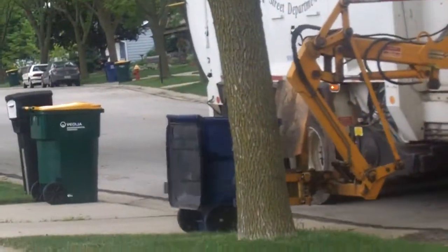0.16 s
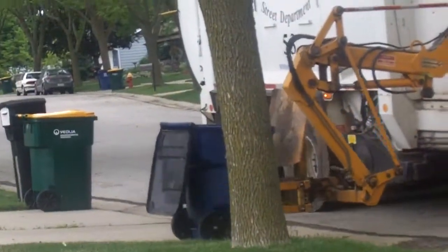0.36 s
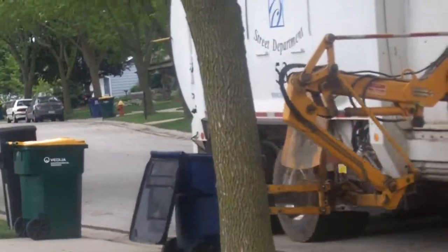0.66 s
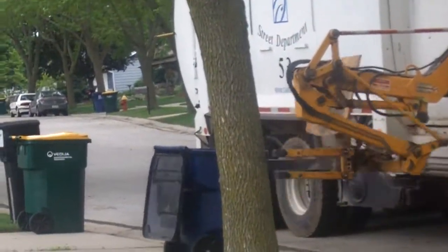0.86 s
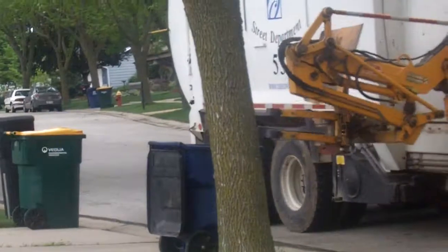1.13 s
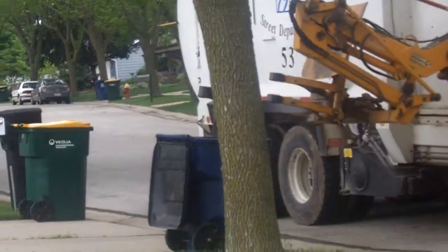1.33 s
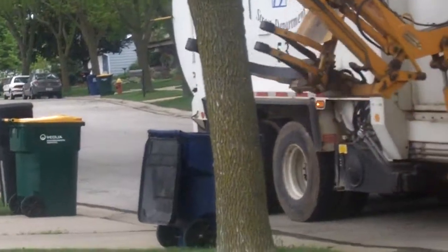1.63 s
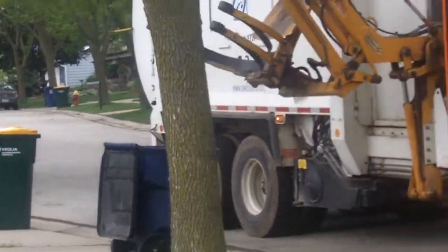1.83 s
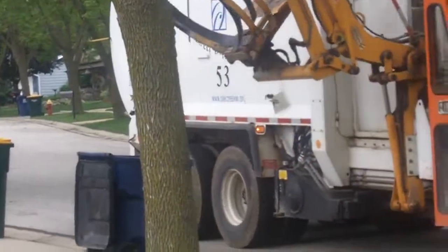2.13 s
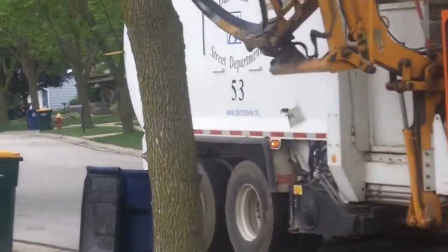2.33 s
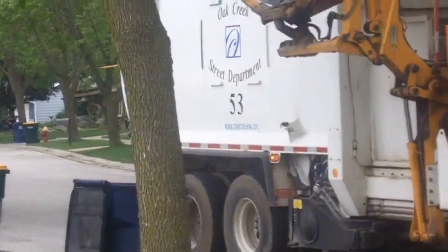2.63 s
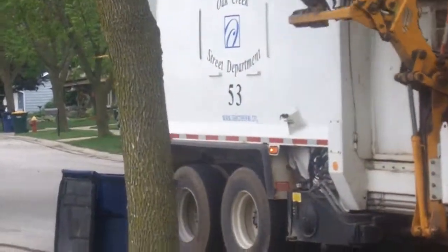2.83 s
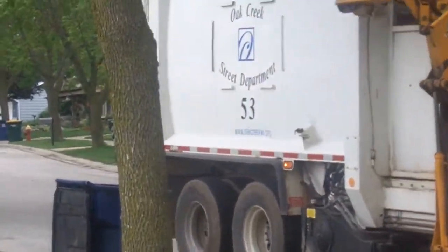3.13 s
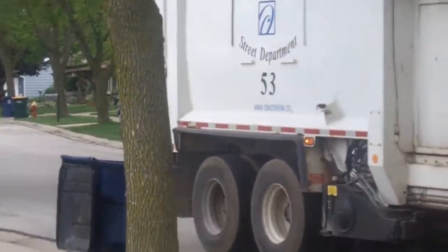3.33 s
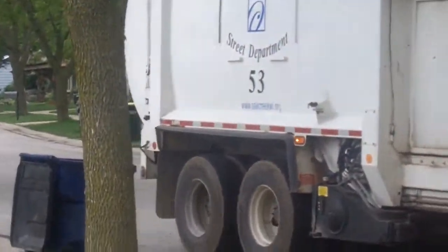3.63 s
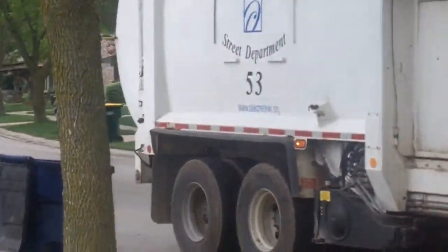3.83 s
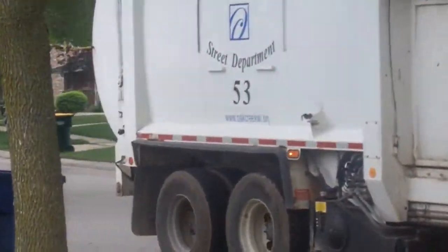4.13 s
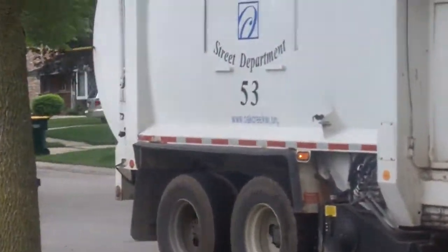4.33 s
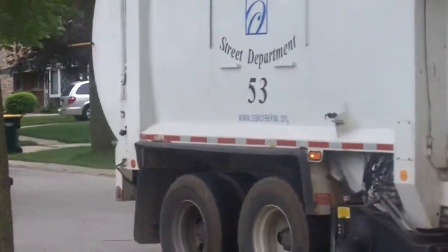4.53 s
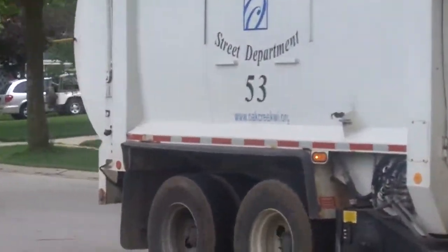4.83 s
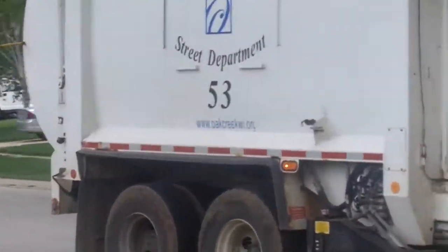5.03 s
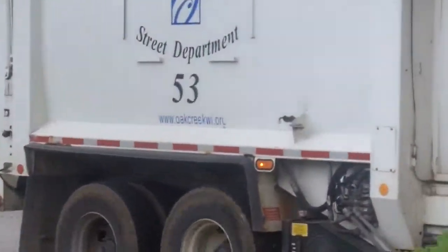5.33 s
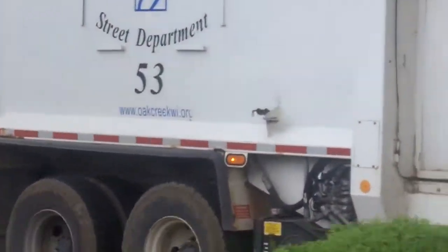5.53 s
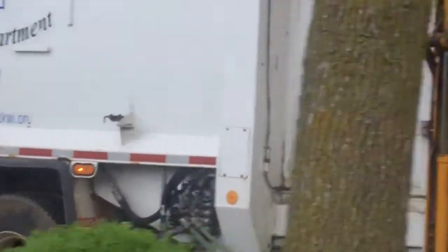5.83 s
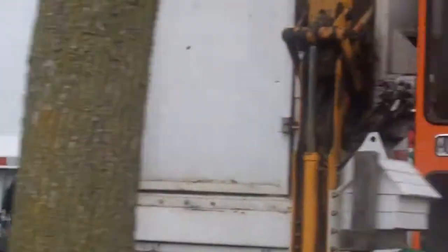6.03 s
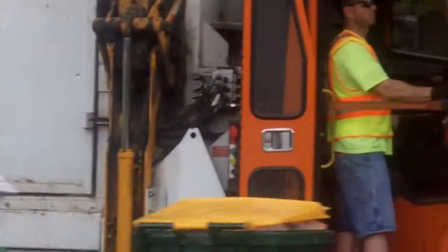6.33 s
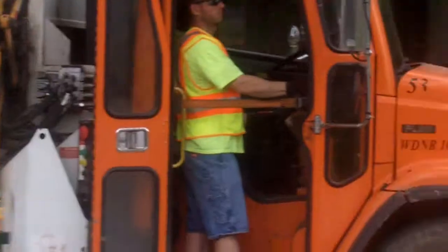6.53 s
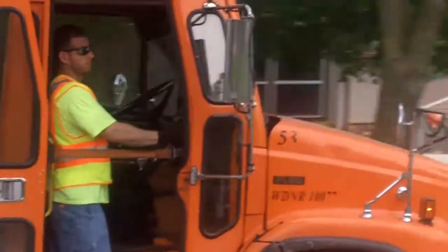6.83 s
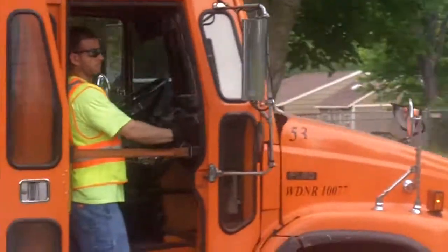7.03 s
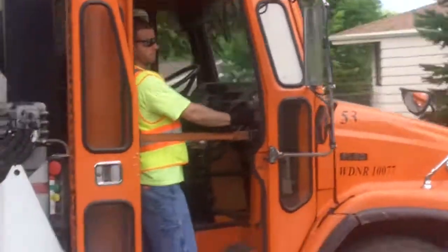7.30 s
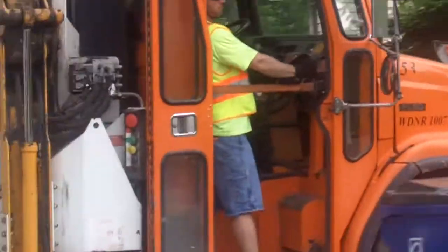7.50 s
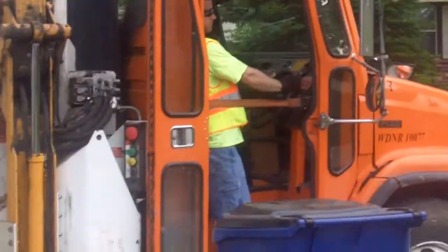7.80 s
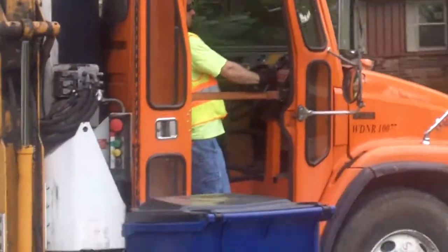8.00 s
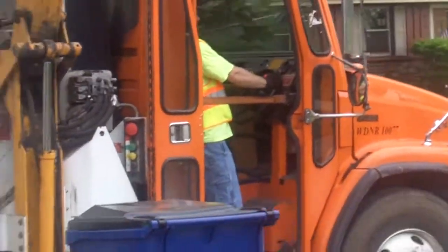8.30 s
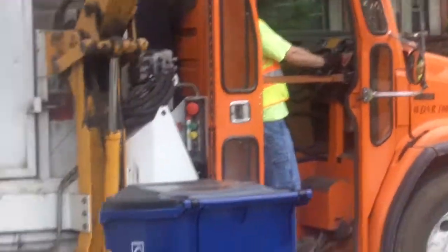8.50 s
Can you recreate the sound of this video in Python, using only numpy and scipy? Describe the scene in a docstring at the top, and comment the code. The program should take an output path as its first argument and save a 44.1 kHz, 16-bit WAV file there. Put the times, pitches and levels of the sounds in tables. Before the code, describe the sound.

Low diesel idle, metal clanks and valve hiss, then an accelerating engine roar with turbo whistle, chuffing throttle release, shrill brake squeal and idle again.

```python
"""A diesel refuse truck idles at the kerb; its hydraulic arm sets down a bin and folds away, heard as
clanks (noise-struck steel resonances), pivot squeaks (gliding narrow noise) and valve hiss (swelling noise).
The truck pulls forward: exhaust harmonics climb over pulsed combustion noise, the stack pings at each firing,
the turbo whistles (narrow noise) and the body rattles and thumps (decaying sines). It slows with turbo flutter,
hissing air (coloured noise) and squealing brakes (unsteady tones), and falls back to idle."""
import sys
import numpy as np
from scipy import signal
from scipy.fft import rfft, irfft, next_fast_len
from scipy.io import wavfile
from scipy.ndimage import uniform_filter1d

SR = 44100
rng = np.random.default_rng(int(sys.argv[2]) if len(sys.argv) > 2 else 0)


def wrap_up_sound(samples):
    """Save the sound to the file named by the first command line argument, as 16-bit audio."""
    columns = np.atleast_2d(samples).T
    # keep every value between -1 and 1, then stretch to whole-number steps
    tamed = np.clip(columns, -1, 1)
    steps = np.round(tamed * 32767).astype(np.int16)
    wavfile.write(sys.argv[1], SR, steps)


N = 381906
TIME = np.arange(N) / SR


def from_db(db):
    """Amplitude ratio from a level in decibels."""
    return 10 ** (np.asarray(db) / 20)


def rms_one(x):
    """Normalization to unit root-mean-square amplitude."""
    return x / np.sqrt(np.mean(x ** 2) + 1e-20)


def in_time(rows):
    """Linear interpolation: one curve over time per column of a table."""
    times, *columns = np.transpose(rows)
    return [np.interp(TIME, times, column) for column in columns]


def bump(s, length):
    """Gaussian envelope of height 1 around time s, down to 1/e at one length either side."""
    return np.exp(-((TIME - s) / length) ** 2)


def held(s, hold_s, attack_s, fade_db_per_s):
    """Attack-hold-decay envelope: full at s, held, then decaying exponentially."""
    attack = np.clip((TIME - s) / attack_s + 1, 0, 1) ** 2
    return attack * from_db(-fade_db_per_s * np.maximum(TIME - s - hold_s, 0))


def noise():
    """White noise: equal power at all frequencies."""
    return rng.standard_normal(N)


def drift(rate):
    """Low-passed random process of spread 1 that changes about rate times a second."""
    step, settle = 20, 4000  # computed at every 20th sample, after the filter has settled
    pole = np.exp(-2 * np.pi * step * rate / SR)
    steps = rng.standard_normal(N // step + settle + 2)
    slow = signal.lfilter([1], [1, -2 * pole, pole * pole], steps)[settle:]
    return np.interp(np.arange(N) / step, np.arange(len(slow)), rms_one(slow))


def tone(hz):
    """Phase integration: a sine of rms 1 that follows a frequency curve."""
    phase_turns = np.cumsum(hz) / SR + rng.random()
    return np.sqrt(2) * np.sin(2 * np.pi * phase_turns)


def narrow_noise(hz, width_hz):
    """Amplitude modulation: two randomly modulated tones form a thin band of noise along a pitch curve."""
    lower = drift(width_hz) * tone(hz)
    upper = drift(width_hz) * tone(hz + width_hz / 2)
    return (lower + upper) / np.sqrt(2)


def coloured(x, spectrum):
    """Spectral shaping: a gain curve that falls away beyond its ends; rms 1."""
    hz, db = np.transpose(spectrum)
    size = next_fast_len(N)
    f = np.maximum(np.fft.rfftfreq(size, 1 / SR), 1)
    ends = np.minimum(1, np.minimum(f / hz[0], hz[-1] / f)) ** 3
    gain = from_db(np.interp(np.log(f), np.log(hz), db)) * ends
    return rms_one(irfft(rfft(x, size) * gain, size)[:N])


def resonate(x, hz, width_hz):
    """Resonance: a peak filter scaled to keep the power of white noise."""
    b, a = signal.iirpeak(hz, hz / width_hz, fs=SR)
    return signal.lfilter(b, a, x + 1e-18) * np.sqrt(SR / np.pi / width_hz)


def swells(rows):
    """Resonant filtering: short swells of friction or flow noise, each through one doubled resonance."""
    out = np.zeros(N)
    for s, length, hz, width, db in rows:
        once = resonate(noise(), hz, 0.95 * width)
        out += from_db(db) * bump(s, length) * rms_one(resonate(once, hz, 0.95 * width))
    return out


def pulses(firing_hz, sharpness, spread_db):
    """Periodic excitation: one decaying pulse of random strength per firing; rms 1."""
    turns = np.cumsum(firing_hz) / SR
    strength = np.clip(rng.standard_normal(1000), -2, 2)[turns.astype(int)]
    return rms_one(np.exp(-sharpness * (turns % 1)) * from_db(spread_db * strength))


def distant(x, edge_hz=10300):
    """High-frequency loss: the brightest edge of a blow fades on its way across the street."""
    return signal.sosfilt(signal.butter(3, edge_hz, fs=SR, output="sos"), x)


# reflections off road, truck side and houses: (delay [s], level [dB])
ECHOES = [(.0065, -6), (0.02, -16), (0.038, -14.5), (.061, -18)]


def street(x):
    """Early reflection: hard surfaces nearby return a few delayed, duller copies."""
    dull = signal.sosfilt(signal.butter(1, 7000, fs=SR, output="sos"), x)
    return x + sum(from_db(db) * np.interp(TIME - delay, TIME, dull, left=0) for delay, db in ECHOES)


# steady hum beside the engine: (mean frequency [Hz], level [dB])
DRONE = [(85, -36.5), (127.5, -42)]


def drone(waver=0.00726):
    """Independent oscillation: a low hum keeps its pitch, but for a slight waver, whatever the engine does."""
    return sum(from_db(db) * tone(hz * (1 + waver * drift(1.89))) for hz, db in DRONE)


# oil through the arm's valves: (mid time [s], length [s], frequency [Hz], nominal width [Hz], level [dB])
VALVES = [(0.033, 0.047, 8000, 1300, -42), (0.765, 0.079, 9900, 1400, -45.5), (0.68, 0.13, 8100, 2500, -50),
          (1.79, 0.039, 3400, 497, -51)]


def valves():
    """Turbulent flow: oil hisses as it is forced through the arm's valves."""
    return swells(VALVES)


# hollow droning notes: (mid time [s], length [s], frequency [Hz], nominal width [Hz], level [dB])
GROANS = [(.55, 0.83, 189, 48.6, -41.5), (6.85, 0.53, 413, 91, -35.5), (7.0, 0.72, 3520, 140.4, -46.5),
          (7.1, 0.79, 805, 84, -37.5), (7.2, 0.39, 4060, 300, -50), (8.26, 0.039, 2160, 160, -38),
          (8.64, 0.015, 1310, 170, -33.5)]


def groans():
    """Narrow resonance: noise takes on hollow, droning pitches that swell and fade."""
    return swells(GROANS)


# dry pivots of the arm: (mid time [s], length [s], pitch [Hz], glide [Hz/s], level [dB])
SQUEAKS = [(.82, .014, 4600, 17000, -48), (.848, .014, 4050, -36000, -46), (1.683, .014, 4600, 17000, -44),
           (1.698, .012, 4400, -55000, -42), (1.733, .005, 4800, -20000, -45),
           (1.755, .011, 3800, 33000, -41), (1.778, .011, 3500, 25000, -44)]


def squeaks(width_hz=110):
    """Frictional slip: a dry pivot gives a thin note that slides up or down."""
    out = np.zeros(N)
    for s, length, hz, glide, db in SQUEAKS:
        pitch = hz + glide * np.clip(TIME - s, -2 * length, 2 * length)
        out += from_db(db) * bump(s, length) * narrow_noise(pitch, width_hz)
    return out


# blows on arm and body: (time [s], nominal level [dB], low modes against the bright edge [dB], rattle decay [s])
CLANKS = [(0.248, -47, 17.5, 0.007), (0.346, -27.5, -6, 0.0091), (0.356, -28.5, -5, 0.016),
          (0.429, -34.5, 0, 0.035), (0.589, -23, -12, 0.013), (0.603, -38, -0.5, 0.24),
          (0.86, -50, 14, 0.044), (0.958, -40, 5.5, 0.029), (1.078, -47, 12, 0.013),
          (1.109, -42.5, 12, 0.019), (1.153, -46, 2, .03), (1.202, -26, -16, 0.01), (1.283, -39, -1, 0.093),
          (3.622, -32.5, 11.5, 0.018), (3.713, -33.5, -3, 0.036), (3.817, -27.5, 5.5, 0.014),
          (3.85, -28, -5, 0.014), (3.904, -32.5, -15, 0.074), (4.013, -32, 4.5, 0.021),
          (4.052, -35, -2, 0.011), (4.206, -32, 2, 0.016), (4.245, -27.5, 3.5, 0.016),
          (4.262, -36, 4, 0.035), (5.008, -36, 6, .015), (5.205, -34.5, 10.5, 0.018), (5.4, -42, 14, .014),
          (6.6, -41, 13, 0.019), (6.703, -40, 10, .015), (7.132, -41, 10, .012), (7.214, -46, 2, .012),
          (7.686, -28, -11, 0.012), (7.812, -34, -9, .006)]
# modes of the steelwork: (frequency [Hz], width [Hz], level [dB])
STEEL = [(453, 110, 1), (990, 1000, 3), (1700, 1200, 2.5), (2580, 790, 4.5), (3880, 2000, 6.5),
         (6780, 1200, 5.5), (7890, 130, 1), (9500, 900, -12)]


def clanks(grain_db=0.5, attack_s=0.00055):
    """Modal excitation: joints chatter at each blow and ring the steel's modes in a balance set per blow."""
    edge, body = np.zeros(N), np.zeros(N)
    for s, db, body_db, decay_s in CLANKS:
        start = int(s * SR)
        age = TIME[:min(SR // 2, N - start)]
        blow = from_db(db - 11.0) * np.exp(-age / decay_s) * (1 - np.exp(-age / attack_s))
        edge[start:start + len(age)] += blow
        body[start:start + len(age)] += blow * from_db(body_db)
    chatter = rms_one(from_db(grain_db * drift(250)))
    out = np.zeros(N)
    for hz, width, db in STEEL:
        force = body if hz < 3000 else edge
        out += from_db(db) * resonate(force * chatter * noise(), hz, width)
    return out


# thumps of the moving body: (time [s], level before the envelope [dB], frequency [Hz])
THUMPS = [(3.612, -9.5, 37.7), (3.717, -11.5, 31.8), (3.82, -16, 45.6), (4.291, -15, 41.7),
          (4.51, -18, 45.7), (4.66, -16, 45.1), (5.008, -17, 60.2), (5.213, -18, 87), (5.343, -34, 84.6),
          (7.47, -17, 54.7)]


def thumps(attack_s=0.0027, decay_s=0.028):
    """Damped oscillation: the hollow body booms softly and dies away within a few cycles."""
    out = np.zeros(N)
    for s, db, hz in THUMPS:
        start = int(s * SR)
        age = TIME[:min(SR // 2, N - start)]
        envelope = (1 - np.exp(-age / attack_s)) * np.exp(-age / decay_s)
        out[start:start + len(age)] += from_db(db) * envelope * np.sin(2 * np.pi * hz * age)
    return out


# brief side notes of the drums: (mid time [s], length [s], pitch [Hz], level [dB])
CHIRPS = [(7.67, .04, 7000, -46), (7.74, .025, 5340, -49), (7.83, .025, 5340, -51),
          (7.706, .04, 11000, -52), (7.81, .04, 12600, -61), (7.854, 0.032, 10900, -54),
          (8.1, .05, 10220, -52), (8.09, .05, 12200, -64), (8.08, .05, 13850, -64), (8.25, .045, 1170, -40),
          (8.32, .08, 1100, -45), (8.26, .045, 2300, -48), (8.63, .04, 3730, -47)]
RUB_S, RUB_HOLD_S, RUB_ATTACK_S, RUB_FADE_DB_PER_S = 7.1, .6, 1.0, 218
RUB_HZ, RUB_RISE_HZ_PER_S, RUB_DB = 4270, 250, -42.5


def rubbing(judder_hz=24, judder=0.34):
    """Sliding friction: shoes judder lightly against the drums and touch off short side notes."""
    pressure = from_db(RUB_DB) * held(RUB_S, RUB_HOLD_S, RUB_ATTACK_S, RUB_FADE_DB_PER_S)
    pitch = RUB_HZ + RUB_RISE_HZ_PER_S * (TIME - RUB_S)
    out = pressure * narrow_noise(pitch, width_hz=69) * (1 + judder * drift(judder_hz))
    for s, length, hz, db in CHIRPS:
        out += from_db(db) * bump(s, length) * narrow_noise(np.full(N, hz), width_hz=37.6)
    return out


# one drum mode each: (time [s], hold [s], starting pitch [Hz], glide [Hz/s], level [dB], fade [dB/s],
# harshness [0-1])
SQUEALS = [(7.572, .02, 8430, 1200, -24.5, 300, .6), (7.622, .004, 8590, 1900, -18, 400, .8),
           (7.67, .02, 4428, 0, -37, 90, .2), (7.82, .05, 4440, 0, -45, 200, .5),
           (7.693, .04, 4431, 0, -22, 420, 0), (7.69, .07, 8160, 700, -39, 200, .8),
           (7.782, .008, 8250, 600, -30, 400, .8), (7.81, .38, 7660, 190, -28.2, 75, .9),
           (7.895, .03, 8600, 900, -40, 130, .9), (8.015, .03, 6086, 0, -36, 100, 0),
           (8.055, .02, 6086, 0, -32, 110, 0), (8.17, .14, 6086, 0, -35, 250, 0),
           (8.12, .04, 9410, -400, -49, 70, .3), (8.335, .05, 7600, -600, -36, 200, .6),
           (8.405, .035, 9325, 0, -35, 200, 0), (8.43, .05, 7320, -400, -33, 200, .2),
           (8.505, .02, 9287, 0, -37, 220, 0), (8.6, .06, 7240, -1000, -36, 200, .3)]
SQUEAL_ATTACK_S, SQUEAL_RING_DB, SQUEAL_RING_DB_PER_S = 0.038, -29, 130


def squeals(pure_flutter_hz=9.3, harsh_flutter_hz=35):
    """Stick-slip: a shoe excites one drum mode; uneven grip chatters in pitch and level, and a faint ring adds."""
    out = np.zeros(N)
    for s, hold, hz, glide, db, fade, harshness in SQUEALS:
        ring = from_db(SQUEAL_RING_DB) * held(s, hold, SQUEAL_ATTACK_S, SQUEAL_RING_DB_PER_S)
        grip = held(s, hold, SQUEAL_ATTACK_S, fade) + ring
        flutter = (pure_flutter_hz + harshness * harsh_flutter_hz) * drift(120)
        pitch = hz + glide * np.clip(TIME - s, 0, hold + 0.35) + flutter
        chatter = rms_one(1 + (.18 + .3 * harshness) * drift(85))
        out += from_db(db) * grip * chatter * tone(pitch)
    return out


# brake valves let off air: (time [s], hold [s], level [dB])
AIR_BLASTS = [(7.46, 0.038, -35), (8.17, 0.33, -35.5)]
# spectrum of the air: (frequency [Hz], level per Hz [dB])
AIR_COLOUR = [(900, -12), (2200, 1), (4000, 3), (7000, 9), (9000, 7), (11000, 1), (13000, -8), (15000, -16)]
AIR_ATTACK_S, AIR_FADE_DB_PER_S = 0.042, 45


def brakes():
    """Turbulence and friction: air rushes through the valves, and the shoes rub and squeal on the drums."""
    flow = sum(from_db(db) * held(s, hold, AIR_ATTACK_S, AIR_FADE_DB_PER_S) for s, hold, db in AIR_BLASTS)
    return flow * coloured(noise(), AIR_COLOUR) + rubbing() + squeals()


# the turbo spools up to a peak, then coasts down
SPOOL_START_S, SPOOL_PEAK_S, SPOOL_END_S = 3.93, 6.15, 7.05
TURBO_REST_HZ, TURBO_PEAK_HZ = 6480, 10330
TURBO_REST_DB, TURBO_PEAK_DB = -52, -48.5
# a second, fainter whistle coasts down
COAST_S, COAST_LENGTH_S, COAST_HZ, COAST_HZ_PER_S, COAST_DB = 7.1, .35, 9300, -3600, -59.5


def turbo(blur_hz=80, skirt_hz=330, skirt_db=-4):
    """Rotor tone: a breathy whistle rises with boost and sinks as the throttle closes; a fainter one trails it."""
    spool = np.interp(TIME, [SPOOL_START_S, SPOOL_PEAK_S, SPOOL_END_S], [0, 1, 0])
    boost = np.sin(np.pi / 2 * spool) ** 2
    hz = TURBO_REST_HZ + (TURBO_PEAK_HZ - TURBO_REST_HZ) * boost
    db = TURBO_REST_DB + (TURBO_PEAK_DB - TURBO_REST_DB) * boost
    core = narrow_noise(hz, blur_hz)
    skirt = boost * from_db(skirt_db) * narrow_noise(hz, skirt_hz)
    whistle = (boost > 0) * from_db(db) * (core + skirt)
    trail_hz = COAST_HZ + COAST_HZ_PER_S * np.clip(TIME - COAST_S, -1, 1)
    trail = from_db(COAST_DB) * bump(COAST_S, COAST_LENGTH_S) * narrow_noise(trail_hz, blur_hz)
    return whistle + trail


# rush and chuffs as the throttle shuts: (mid time [s], length [s], frequency [Hz], nominal width [Hz], level [dB])
SURGE = [(6.67, 0.17, 7500, 1210, -37.5), (6.9, 0.25, 6500, 1900, -38.5), (6.685, .011, 7300, 1200, -31),
         (6.757, .005, 6400, 900, -26), (6.783, 0.0064, 7200, 1400, -32), (6.834, .007, 6300, 1000, -26),
         (6.863, .006, 6400, 1400, -33), (6.887, .005, 6550, 1200, -33), (6.942, 0.0045, 6700, 1400, -32),
         (7.088, .008, 5950, 400, -32)]


def surge():
    """Compressor surge: as the throttle shuts, a rush of air breaks into chuffs."""
    return swells(SURGE)


# the stack's ping, higher and louder while the gas is hot:
# (time [s], frequency [Hz], level [dB], upper modes against it [dB])
WHINE = [(0, 2498, -58, -5), (.85, 2540, -58, -6), (1.08, 2550, -46, -12), (1.48, 2540, -49.5, -12),
         (1.8, 2540, -50, -12), (1.86, 2600, -45, -14), (2.4, 2610, -46, -10), (2.9, 2610, -43, -8),
         (3.04, 2615, -41, -9), (3.2, 2620, -42.5, -6), (3.8, 2636, -44, -3), (4.5, 2650, -43, -1),
         (5.2, 2680, -41.5, 0), (5.9, 2640, -42, -3), (6.3, 2630, -42.5, -2), (6.65, 2440, -44, -4),
         (7.4, 2430, -46, -6), (7.8, 2424, -60, -4), (8.66, 2394, -51, -4)]
# upper modes: (multiple of the ping's pitch, level [dB])
WHINE_MODES = [(1.057, -3.5), (1.15, -12.5), (1.41, -5)]
PING_RISE_S, PING_DECAY_S, PING_SPREAD_DB, PING_SCATTER_HZ = .0015, .005, 3.0, 62


def whine(firing_hz):
    """Modal excitation: each firing pings the exhaust stack's cross modes with random strength and pitch."""
    hz, db, upper_db = in_time(WHINE)
    turns = np.cumsum(firing_hz) / SR
    age = (turns % 1) / firing_hz
    decay = np.exp(-age / PING_DECAY_S)
    modes = [(1, 0)] + [(multiple, upper_db + mode_db) for multiple, mode_db in WHINE_MODES]
    out = np.zeros(N)
    for multiple, mode_db in modes:
        strength, detune = np.clip(rng.standard_normal((1000, 2)), -2, 2)[turns.astype(int)].T
        pings = decay * from_db(PING_SPREAD_DB * strength)
        pings = uniform_filter1d(pings, size=int(2 * PING_RISE_S * SR))  # softens each onset
        out += from_db(db + mode_db) * rms_one(pings) * tone(multiple * hz + PING_SCATTER_HZ * detune)
    return out


# hardest pings of the stack: (time [s], level [dB])
HARD_PINGS = [(2.759, -38), (2.832, -31.5), (2.97, -32), (2.987, -34), (3.004, -33), (3.071, -28),
              (3.187, -32), (3.428, -32), (3.46, -30), (4.527, -29), (4.865, -32), (4.912, -28)]


def hard_pings(length_s=.004):
    """Impulsive excitation: now and then the stack is struck much harder, at the whine's pitch."""
    strikes = sum(from_db(db) * bump(s, length_s) for s, db in HARD_PINGS)
    return strikes * tone(in_time(WHINE)[0])


def growl(firing_hz, size=256):
    """Periodicity: noise repeated every second firing has dense overtones that glide with the engine."""
    cycle = np.cumsum(firing_hz) / SR / 2 % 1
    pattern = rng.standard_normal(size)
    return np.interp(cycle * size, np.arange(size), pattern, period=size) * np.sqrt(firing_hz)


# how hard the truck works, before trims: (time [s], rumble level [dB], roar level [dB])
EFFORT = [(0.0, -38.5, -42.5), (0.47, -37, -41), (1.85, -42, -43), (2.2, -40, -38.5), (2.53, -31, -37.5),
          (3.1, -35.5, -34.5), (3.91, -29.5, -31.5), (4.26, -30.5, -32.5), (5.23, -28, -31),
          (6.15, -27, -29.5), (7.17, -26.5, -33), (7.38, -26.5, -33), (7.98, -40, -48), (8.5, -42, -43.5)]
# brief shakes of the running gear: (mid time [s], length [s], roar gain [dB], clatter gain [dB])
SHAKES = [(0.06, 0.065, 2.5, 5.5), (0.36, 0.033, -3, 5), (.68, 0.16, -3.5, 0.5), (2.485, 0.15, 7.5, 4),
          (3.083, 0.051, 4, 2), (5.36, 0.053, 2.5, 1.5), (7.699, 0.011, 8.5, 12), (8.236, 0.042, -6, 7),
          (8.65, 0.057, 5.5, 7)]
# spectra of the three noises: (frequency [Hz], level per Hz [dB])
RUMBLE = [(18, -12), (35, 12.5), (60, 3), (120, 9), (190, 2), (300, 1), (420, -3), (560, -9.5), (1000, -11)]
ROAR = [(300, -28), (480, -6), (580, -3), (700, 5.5), (840, 4), (960, 0), (1100, -3), (1400, 0.5),
        (1800, -6.5), (2600, -9.5)]
CLATTER = [(1200, -8.5), (2000, 2.5), (2700, -1), (3200, -2), (3700, -1), (4700, -1), (6600, -1.5),
           (8000, -7.5), (10000, -17.5), (12000, -27), (15000, -45)]
# engine block modes: (frequency [Hz], width [Hz], relative level [dB])
BLOCK = [(700, 60, -15), (830, 90, -6), (930, 70, -12), (1440, 140, -13)]
RUMBLE_DB, ROAR_DB = 1, -1.54  # trims on the effort levels
CLATTER_DB, REFERENCE_ROAR_DB = -36, -33  # base clatter level, and the roar effort at which it holds
CLATTER_FOLLOWS = 0.85  # share of the roar's swing in dB
ROAR_LOCKED = .5  # share of the roar's power that repeats with the cylinders as a growl
PUFF_DEPTH, PUFF_SPREAD_DB, KNOCK_SPREAD_DB = .25, 3.5, 4.0


def combustion(firing_hz, lump_db=1.0, rattle_db=0.68, unsteady_db=0.96):
    """Pulsed excitation: firings puff noise and knock the block; loose parts rattle in irregular clusters."""
    rumble_db, effort_db = in_time(EFFORT)
    waver_db = unsteady_db * drift(3.8)
    roar_shake_db = sum(db * bump(s, length) for s, length, db, _ in SHAKES)
    clatter_shake_db = sum(db * bump(s, length) for s, length, _, db in SHAKES)
    roar_db = effort_db + ROAR_DB + waver_db + roar_shake_db
    clatter_db = CLATTER_DB + CLATTER_FOLLOWS * (effort_db - REFERENCE_ROAR_DB) + waver_db + clatter_shake_db

    puffs = rms_one(1 + PUFF_DEPTH * pulses(firing_hz, sharpness=3, spread_db=PUFF_SPREAD_DB))
    lumps = from_db(lump_db * drift(9.8))
    rumble = from_db(rumble_db + RUMBLE_DB) * coloured(noise() * lumps, RUMBLE)

    free_roar = np.sqrt(1 - ROAR_LOCKED) * coloured(noise() * puffs, ROAR)
    locked_roar = np.sqrt(ROAR_LOCKED) * coloured(growl(firing_hz), ROAR)
    roar = from_db(roar_db) * (free_roar + locked_roar)

    rattle = from_db(rattle_db * drift(29))
    clatter = from_db(clatter_db) * coloured(noise() * puffs * rattle, CLATTER)

    knocks = pulses(firing_hz, sharpness=12, spread_db=KNOCK_SPREAD_DB)
    block = sum(from_db(db) * resonate(knocks * noise(), hz, width) for hz, width, db in BLOCK)
    return rumble + roar + clatter + from_db(clatter_db - 4.0) * distant(block, edge_hz=8400)


# exhaust note: (time [s], boom level at the firing rate [dB], upper overtones level [dB])
EXHAUST = [(0,-17.5,-42),(.7,-18.5,-39),(1.95,-15.5,-42),(2.4,-21.5,-32),(2.75,-19,-37),(3.5,-21,-38.5),(3.95,-28.5,-62),(4.65,-21,-40.5),(5.1,-28,-33.5),(5.9,-26,-36),(6.35,-30,-37),(6.6,-38,-34.5),(7.22,-37,-39.5),(7.5,-24,-35.5),(7.7,-36,-43),(8,-22.5,-40),(8.35,-27.5,-58),(8.66,-19.5,-46)]
# overtones from unequal cylinders: (multiple of the firing rate, relative level [dB])
OVERTONES = [(.5, -8.5), (1.5, -12), (2.5, -7.5), (3, 1), (3.5, 1.5), (4, -8.5), (5, -21), (7, -11.5),
             (9, -15)]
# pipe response: (frequency [Hz], gain [dB])
TAILPIPE = [(40, 9), (110, 0), (170, -13), (215, -3), (260, -0.5), (330, -3.5), (400, -17), (520, -31),
            (800, -20)]
# overtones that blare or growl as the load changes:
# (mid time [s], length [s], multiple of the firing rate, level [dB])
BLARES = [(1.65, .3, 9, -49), (3.2, 0.36, 2, -35.5), (3.948, 0.22, 2, -31), (4.6, 0.24, 2, -34),
          (5.95, .2, 2, -34.5), (7.15, .19, 2, -25), (7.5, 0.075, 2, -24), (3.2, .4, 4, -42),
          (3.854, 0.2, 5, -36), (3.95, .22, 6, -38.5), (4.386, 0.16, 3, -36), (5.1, .2, 3, -33.5),
          (5.6, .25, 3, -35), (6.42, 0.14, 3.5, -33), (6.65, .12, 3, -36), (7.3, .2, 3.5, -33.5),
          (6.87, .13, 5, -35), (8.5, .2, 3, -40), (8.55, .16, 6, -42)]
SECOND_DB = -41  # second harmonic of the firing rate
OVERTONE_ROUGHNESS = .18


def exhaust(firing_hz, boom_rough=0.13, sway=0.31):
    """Harmonic series: a boom at the firing rate, with overtones that swell with load and pipe resonances."""
    boom_db, upper_db = in_time(EXHAUST)
    pipe_hz, pipe_db = np.transpose(TAILPIPE)
    gains = {2: from_db(SECOND_DB) * (1 + sway * drift(2.0))}
    for multiple, db in OVERTONES:
        pipe_gain_db = np.interp(multiple * firing_hz, pipe_hz, pipe_db)
        gains[multiple] = from_db(upper_db + db + pipe_gain_db)
    for s, length, multiple, db in BLARES:
        gains[multiple] = np.hypot(gains.get(multiple, 0), from_db(db) * bump(s, length))
    out = from_db(boom_db) * tone(firing_hz) * (1 + boom_rough * drift(25))
    for multiple, gain in gains.items():
        roughness = 1 + OVERTONE_ROUGHNESS * drift(10.6)
        out += gain * tone(multiple * firing_hz) * roughness
    return out


# six-cylinder engine speed before its waver: (time [s], firing rate [1/s])
SPEED = [(0,34),(.55,36),(.95,32.5),(1.65,36.2),(1.97,35.5),(2.4,49),(2.7,54),(3.13,60.6),(3.6,66),(4.07,74.7),(4.86,85),(5.38,92.3),(6.05,99.5),(6.35,97),(6.65,80),(7.0,72),(7.33,66),(7.52,58),(7.72,45),(7.98,36.5),(8.4,34.4),(8.66,31)]


def scene(speed_waver=0.00624):
    """Superposition with level panning: the truck stands ahead; exhaust and brakes lean slightly left."""
    firing_hz = in_time(SPEED)[0] * (1 + speed_waver * drift(9.24))
    body = street(distant(clanks())) + squeaks() + thumps() + valves() + groans()
    engine = drone() + turbo() + surge() + whine(firing_hz) + hard_pings() + combustion(firing_hz)
    left_right = from_db([[.22], [-.22]])
    return engine + body + (exhaust(firing_hz) + brakes()) * left_right


NOTCH_HZ, NOTCH_WIDTH_HZ, CUTOFF_HZ = 5484, 2060, 15250


def record(dry):
    """Linear filtering: the recorder leaves a deep notch in the treble and a steep top cut."""
    b, a = signal.iirnotch(NOTCH_HZ, NOTCH_HZ / NOTCH_WIDTH_HZ, fs=SR)
    notched = signal.lfilter(b, a, dry)
    return signal.sosfilt(signal.ellip(10, .1, 90, CUTOFF_HZ, fs=SR, output="sos"), notched)


dry = scene()
out = record(dry)
wrap_up_sound(out)
```